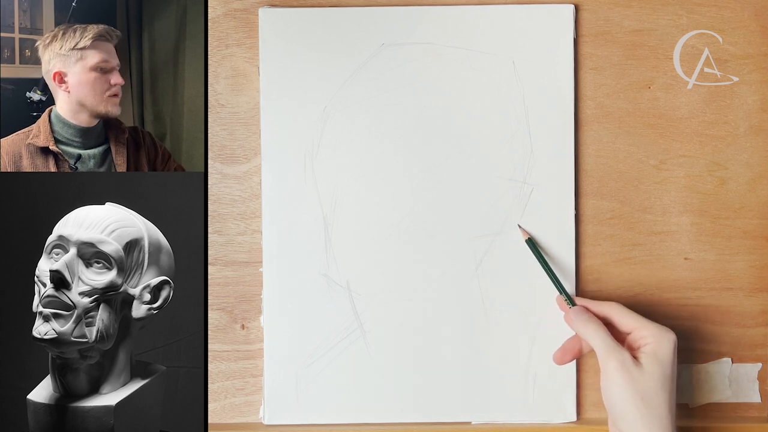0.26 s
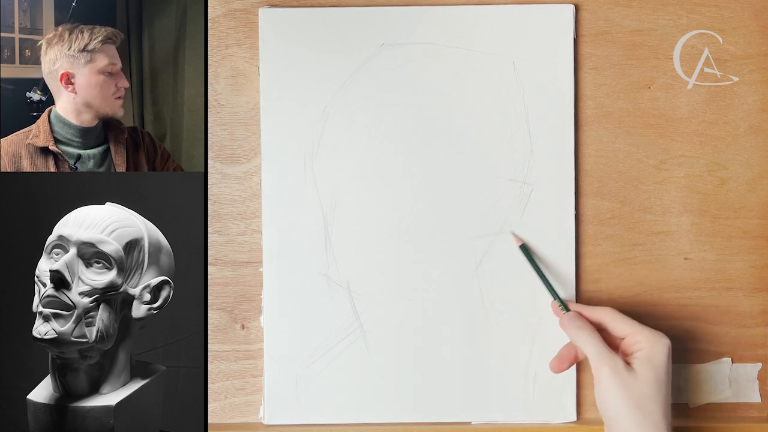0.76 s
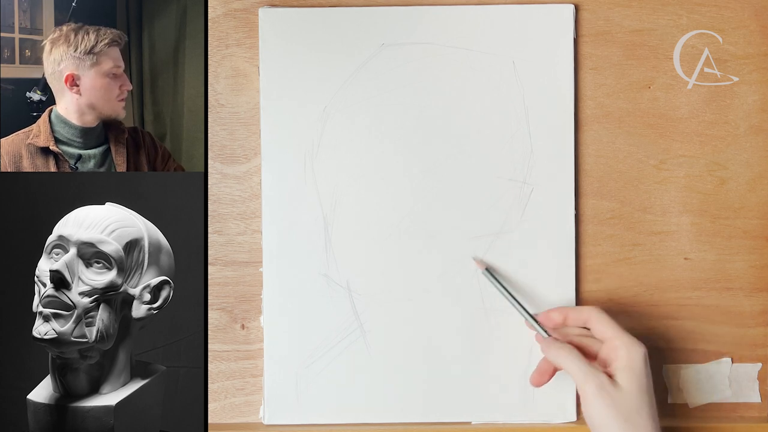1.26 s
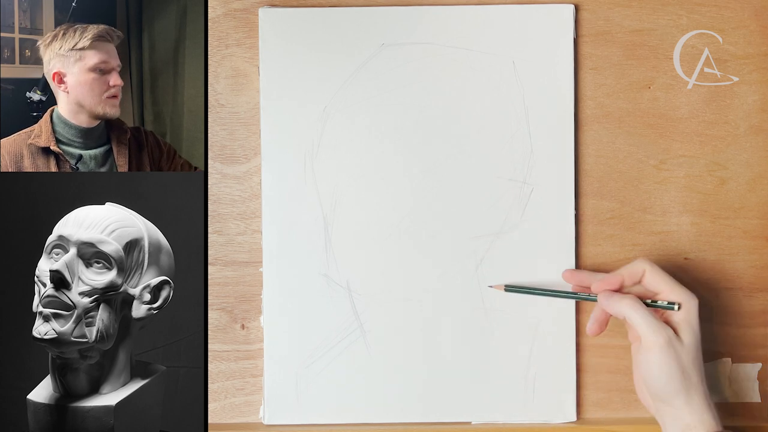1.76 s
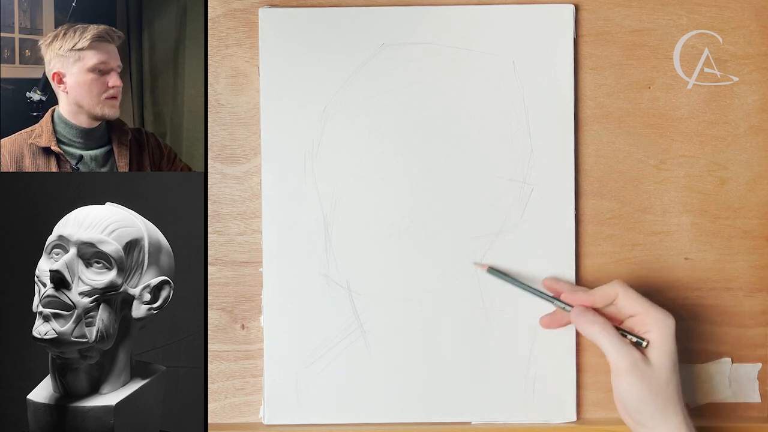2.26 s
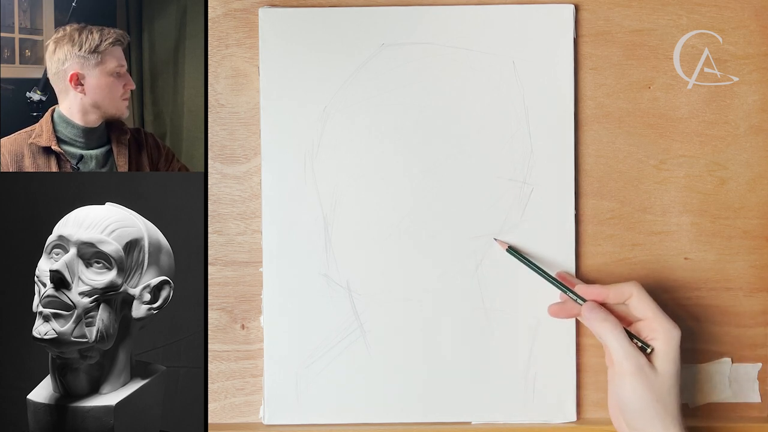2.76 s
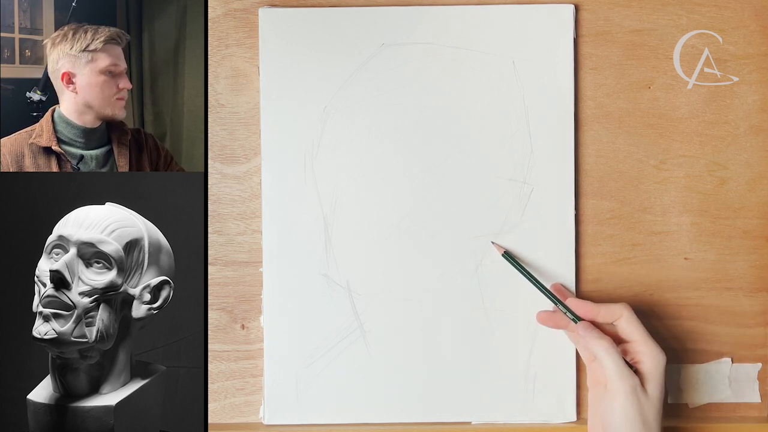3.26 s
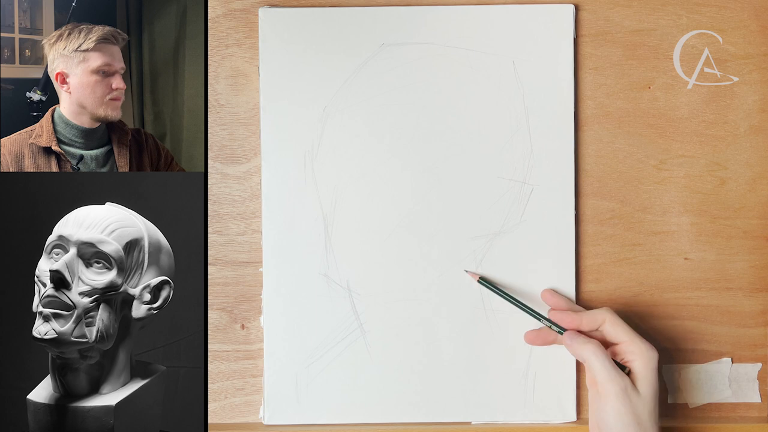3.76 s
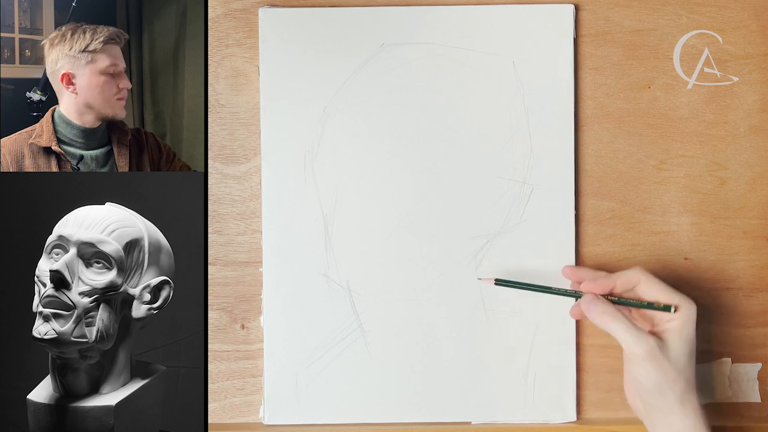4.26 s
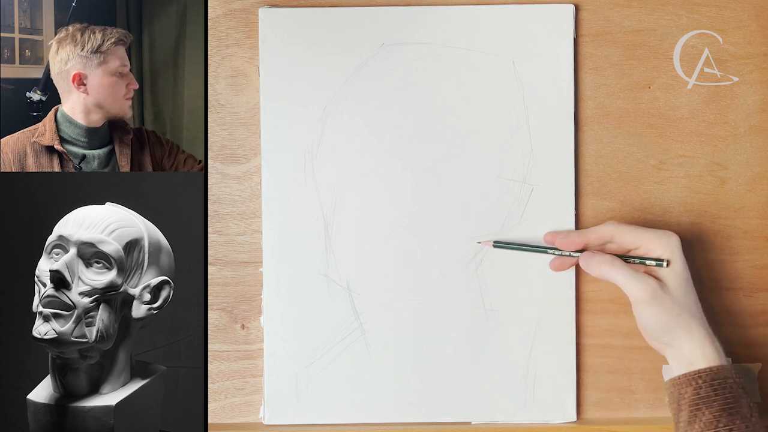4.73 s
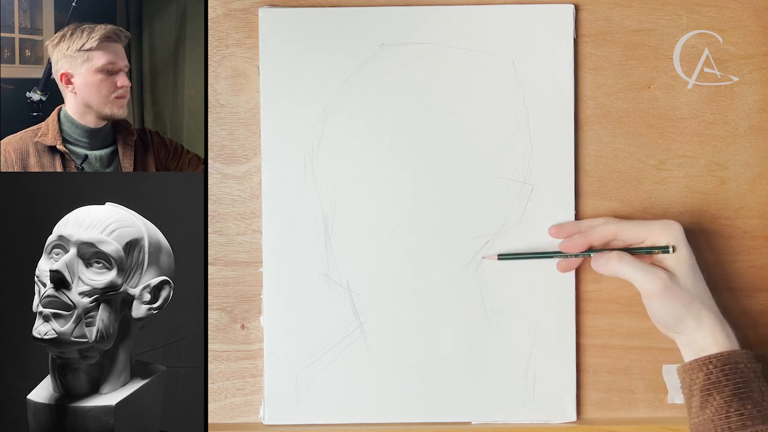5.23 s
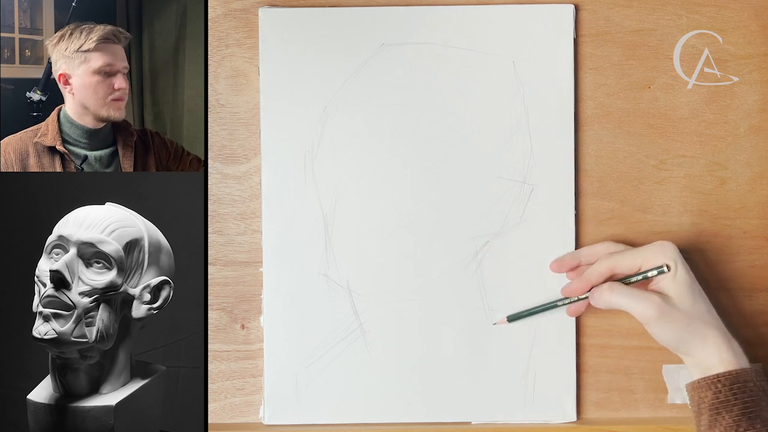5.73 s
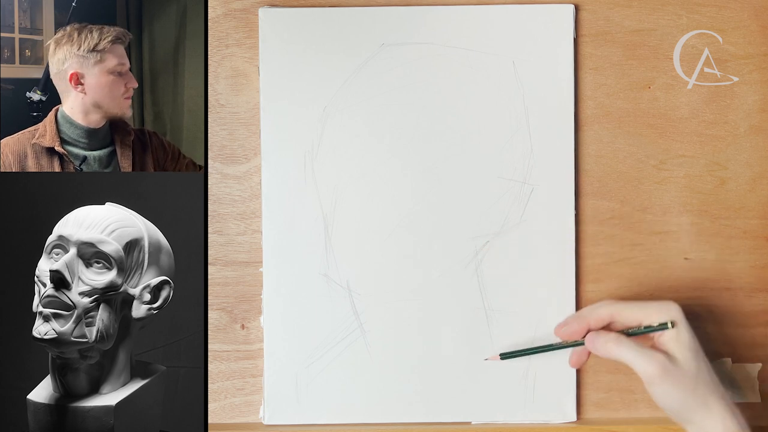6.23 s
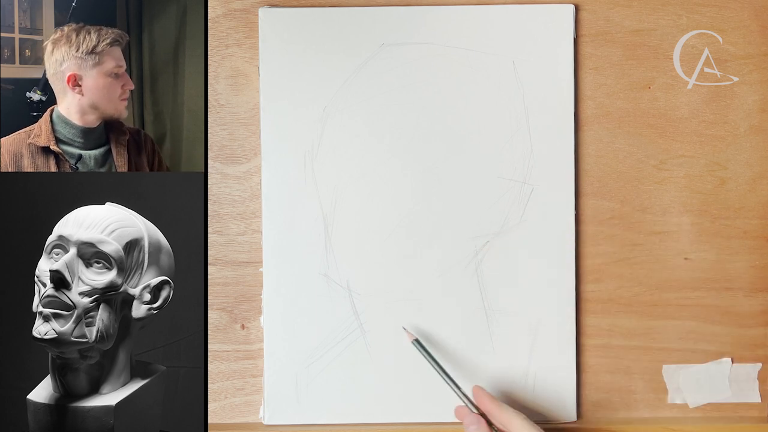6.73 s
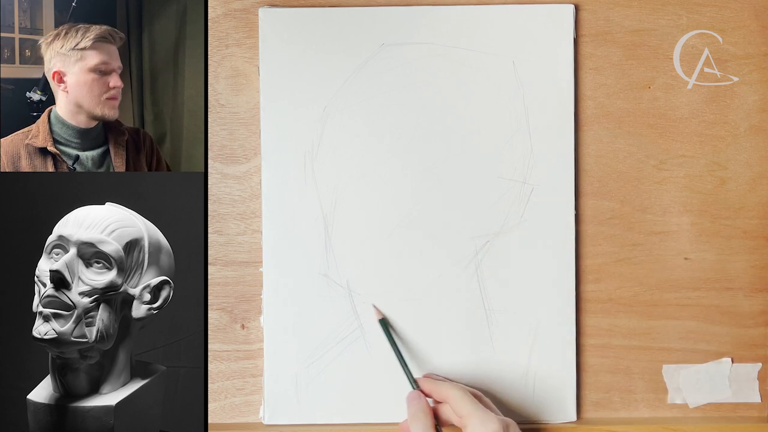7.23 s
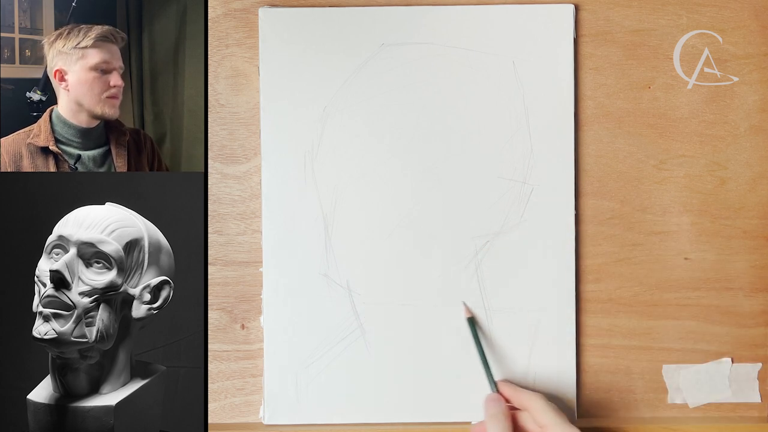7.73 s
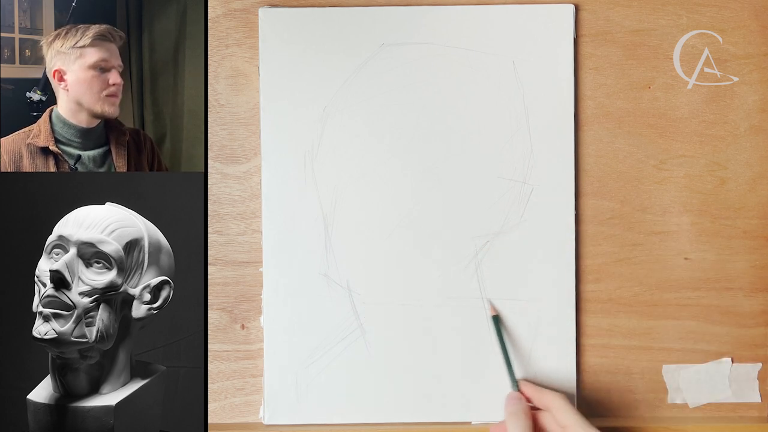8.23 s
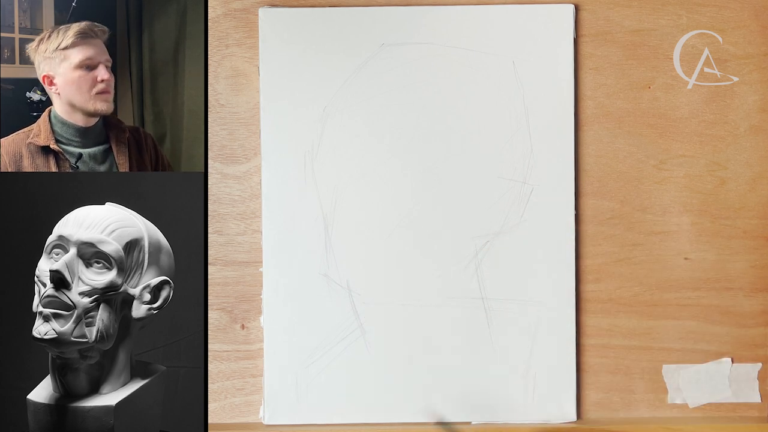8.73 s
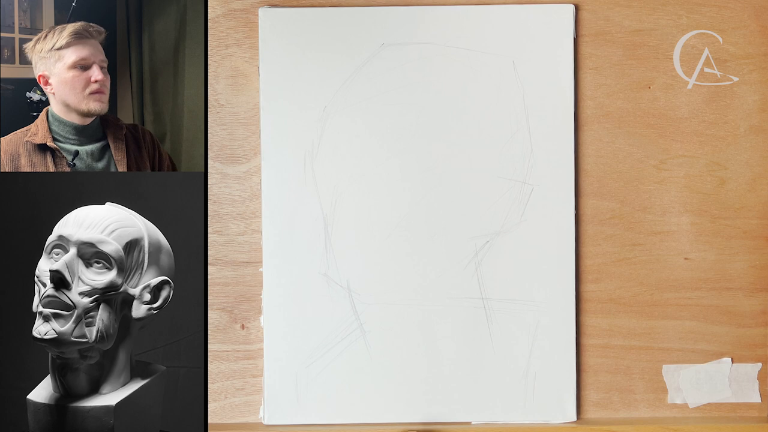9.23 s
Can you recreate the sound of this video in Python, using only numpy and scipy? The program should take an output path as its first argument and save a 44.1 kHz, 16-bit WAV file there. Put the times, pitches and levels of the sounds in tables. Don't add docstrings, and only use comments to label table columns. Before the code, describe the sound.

Close, crisp pencil sketching in a quiet room: quick hatching, single firmer strokes, soft hand rubs, one sharp clack near the end, low wavering hum.

```python
import sys
import numpy as np
from scipy import signal
from scipy.io import wavfile
from scipy.ndimage import uniform_filter1d

SR = 44100
rng = np.random.default_rng(int(sys.argv[2]) if len(sys.argv) > 2 else 0)


def materialize(psi):
    bounded = np.clip(np.atleast_2d(psi).T, -1, 1)
    quanta = np.round(bounded * 32767).astype(np.int16)
    wavfile.write(sys.argv[1], SR, quanta)


def how_loud(loudness_db):
    steps = np.asarray(loudness_db, float) / 20
    return 10 ** steps


N = 418509


def evened(x):
    return x / np.sqrt(np.mean(x ** 2) + 1e-20)


def coloured(x, points, size=2048):
    point_hz, point_db = np.transpose(points)
    hz = abs(np.fft.fftfreq(size, 1 / SR))
    log_gain = np.interp(np.log(hz + 1), np.log(point_hz + 1), point_db) * np.log(10) / 20
    taps = np.fft.ifft(np.exp(np.conj(signal.hilbert(log_gain)))).real
    first_half, second_half = abs(taps[1:size // 2]).sum(), abs(taps[size // 2:]).sum()
    if first_half <= second_half:
        taps = np.roll(taps[::-1], 1)
    return signal.oaconvolve(x, taps[:size // 2])[:len(x)]


def blend(low, high, lean_db):
    share = 1 / (1 + how_loud(-2 * lean_db))
    return np.sqrt(1 - share) * evened(low) + np.sqrt(share) * evened(high)


def patchy(x, patchy_db, size=512):
    overlap = size * 3 // 4
    z = signal.stft(x, nperseg=size, noverlap=overlap)[2]
    patches = rng.standard_normal(z.shape[::-1]).T
    patches = uniform_filter1d(uniform_filter1d(patches, 3, 0), 14, 1)
    return signal.istft(z * how_loud(patchy_db * evened(patches)), nperseg=size, noverlap=overlap)[1][:N]


def modes_ring(modes):
    t = np.arange(SR // 4) / SR
    ring = 0
    for k, (hz, width, db) in enumerate(modes):
        fading = np.sqrt(width) * np.exp(-np.pi * width * t)
        ring = ring + (-1) ** k * how_loud(db) * fading * np.sin(2 * np.pi * hz * t)
    return ring


def add(mix, s, sound):
    part = mix[round(s * SR):][:len(sound)]
    part += sound[:len(part)]


def played(table, s):
    at, *columns = np.transpose(table)
    return [np.interp(s, at, c) for c in columns]


def hump(rows, s):
    peak_s, build_s, lift_s = np.transpose(rows)[:3, :, None]
    return (s - peak_s) / np.where(s < peak_s, abs(build_s), abs(lift_s))


EDGE_DB = 21
LEAN_SHARP = 1.3


def swells(rows, s):
    peak_db = np.transpose(rows)[3, :, None]
    return how_loud(2 * (peak_db - EDGE_DB * abs(hump(rows, s)) ** LEAN_SHARP)).sum(0)


# (frequency [Hz], level [dB])
HISS = [(5500, -47.5), (7000, 10), (10000, 3.5), (10600, -35.5)]
EDGE = [(9900, -39.5), (10400, 5.5), (13000, -4.5), (14200, -12)]
# (frequency [Hz], level [dB])
TIP = [(13500, -35), (14200, 1), (15600, -5), (16200, -21)]
TIP_DB = -7.5
# (frequency [Hz], level [dB])
DULL_SCRAPE = [(1450, -12), (2000, -2.5), (2760, -2), (3300, -2), (6000, -20.5)]
BRIGHT_SCRAPE = [(2500, -27.5), (3700, 2.5), (4400, 0.5), (4950, 6), (5600, 6.5), (6800, 6.5), (8000, -23)]
# (frequency [Hz], level [dB])
SKIN = [(900, -35), (1500, 2.5), (2000, -4.5), (2700, -1), (3600, -9.5), (6000, -39.5)]
# (frequency [Hz], level [dB])
SHAFT = [(2200, -36), (2650, 6.5), (2900, 3), (3300, -3.5), (4000, -35.5)]
# (frequency [Hz], width [Hz], level [dB])
LOW_SHEET = [(482.6, 18, -5.5), (623, 45, -1.5), (700, 32, -2.5), (766, 35, 0.5), (940, 60, 0)]
HIGH_SHEET = [(1079, 70, 0), (1197, 67, -1.5), (1400, 65, -0.5), (1580, 110, -7.5), (1725, 50, -4),
              (2026, 270, -13.5)]
LOW_BOARD = [(236, 44, -5.5), (270, 47, -1.5)]
HIGH_BOARD = [(341.9, 15.7, 1), (455, 164, -3)]


def pencil(catches_per_s=9000, uneven_db=1.0, flicker_db=0.2, mic_lift_db=-12, press=0.27):
    hiss_db, scrape_db, sheet_db, boom_db, skin_db, bite_db, grip_db, place_db, reach_db = contact()
    catches = rng.standard_normal(N) * how_loud(uneven_db * np.minimum(rng.exponential(1, N), 4))
    catches *= rng.random(N) < catches_per_s / SR
    catches *= how_loud(flicker_db * evened(uniform_filter1d(rng.standard_normal(N), 300)))
    shifting = patchy(catches, patchy_db=3.0, size=2048)
    flank = catches * rng.choice([-1., 1.], N)
    catches, flank = (patchy(x, patchy_db=2.5) for x in (catches, flank))

    pressed_db = press * np.clip(sheet_db - hiss_db, -20, 10)
    hiss = blend(coloured(flank, HISS), coloured(catches, EDGE), -0.5 + pressed_db)
    scrape = blend(coloured(flank, DULL_SCRAPE), coloured(catches, BRIGHT_SCRAPE), grip_db)
    skin = evened(coloured(flank, SKIN))
    bite = evened(coloured(catches, SHAFT))
    tip = evened(coloured(flank, TIP))

    bodies = (LOW_SHEET, HIGH_SHEET, LOW_BOARD, HIGH_BOARD)
    low_sheet, high_sheet, low_board, high_board = [
        signal.oaconvolve(shifting, modes_ring(modes))[:N] for modes in bodies]
    sheet = blend(low_sheet, high_sheet, place_db)
    board = blend(low_board, high_board, reach_db)

    out = how_loud(hiss_db + mic_lift_db) * hiss + how_loud(scrape_db) * scrape
    out += how_loud(skin_db) * skin + how_loud(bite_db) * bite
    out += how_loud(1.35 * sheet_db + TIP_DB) * tip
    return out + how_loud(sheet_db) * sheet + how_loud(boom_db) * board


# (peak time [s], build-up [s], lift-off [s], speed as hiss level [dB],
# pressure as ring of the sheet over hiss [dB])
LINES_DRAWN = [(1.086, 0.05, 0.08, -34, 1), (2.255, 0.029, 0.081, -44.5, 10.5),
               (2.225, 0.037, 0.12, -43, -6), (3.66, 0.02, 0.028, -51.5, 3), (3.7, 0.042, 0.067, -39, 5),
               (3.858, 0.09, 0.065, -44, 6), (3.993, 0.054, 0.07, -41.5, 9.5), (5.49, 0.022, .04, -63, 1),
               (5.508, 0.024, 0.1, -54, 8.5), (5.601, 0.12, 0.18, -43, 4.5),
               (5.897, 0.15, 0.056, -40.5, 3.5), (5.998, 0.03, .05, -48, 6), (6.09, 0.13, 0.094, -39, 6.5),
               (7.25, 0.085, .06, -52, -12), (7.335, 0.12, 0.2, -35, -12), (7.433, 0.1, 0.074, -42.5, 4),
               (7.68, 0.017, 0.13, -40, -6.5), (7.93, 0.075, 0.12, -43, 6.5), (8.0, 0.1, 0.091, -41.5, -22),
               (8.255, 0.088, 0.088, -52, 8.5), (8.469, 0.1, 0.049, -44.5, 5.5)]
HATCHING = [(.477, 0.048, 0.1, -41, -18.5), (.587, 0.051, 0.043, -43, -19),
            (0.676, 0.06, 0.066, -41, -21.5), (.78, 0.068, 0.066, -40, -18), (.886, 0.064, 0.059, -41, -13),
            (.988, 0.064, 0.063, -40, -13.5), (1.044, 0.017, 0.05, -41, -21.5),
            (1.812, .008, .04, -47.5, -12), (1.839, 0.024, 0.05, -31, -21.5),
            (1.938, 0.045, 0.039, -41.5, -20), (5.71, 0.19, 0.063, -43.5, -1),
            (5.82, 0.034, 0.034, -55, 11), (6.941, 0.088, 0.035, -48.5, -16.5),
            (8.19, 0.081, 0.13, -40, -22), (8.4, 0.031, 0.068, -64, 13), (8.521, 0.087, 0.052, -40, -28.5)]
GRAZES = [(.003, 0.007, 0.013, -53, -4.5), (0.099, 0.12, 0.064, -58, -18), (.4, 0.055, 0.064, -75, -13),
          (1.3, 0.032, 0.086, -66.5, -6), (1.507, 0.036, 0.086, -86, 17.5),
          (1.763, 0.0044, 0.043, -66.5, 2.5), (2.13, .021, .04, -77, 4), (2.682, 0.052, 0.052, -64, -1),
          (2.944, 0.032, 0.054, -64.5, 2.5), (3.133, 0.01, 0.054, -60.5, -3.5),
          (3.504, 0.027, 0.15, -79, -1), (4.49, 0.021, 0.059, -75, -4.5), (4.575, 0.052, 0.031, -73.5, -11),
          (4.625, 0.013, 0.042, -68, 1), (4.685, 0.025, 0.033, -69.5, 3.5), (4.82, 0.21, 0.13, -78, 4),
          (5.4, 0.024, 0.032, -79.5, -7), (7.09, 0.072, 0.73, -78.5, 6.5)]
DRAGS = [(2.203, 0.014, 0.09, -54.5, -1.5), (6.506, .006, .05, -81, 15), (6.526, 0.0077, 0.066, -46.5, -3),
         (6.58, 0.096, 0.088, -74.5, 13), (6.79, 0.011, 0.077, -44.5, -19), (7.667, .0025, 0.025, -49, -10),
         (8.803, .006, .08, -58, -36), (8.82, 0.066, 0.38, -49, -24), (9.15, .1, 0.14, -73, 0),
         (8.91, 0.087, 0.041, -52.5, -18), (8.938, 0.0032, 0.06, -29.5, -24),
         (8.944, 0.0078, 0.17, -40.5, -8.5), (9.33, 0.036, 0.068, -59.5, -23),
         (9.39, 0.037, 0.045, -49, -18), (9.03, .04, 0.071, -68, -13), (9.45, .04, 0.034, -81, 3)]
# (suddenness of landing [power], of lifting [power], sharpness of pressure [power],
# scrape over hiss [dB], grip [dB])
TOUCH = [
    (3.2, 2.75, 0.68, -8, 2),
    (2.5, 1.36, 1.5, -8, 7),
    (5.1, 3, 0.8, 0, 6.5),
    (3.9, 1.9, 0.5, -3, 10),
]
# (time [s], sheet as high over low tones [dB], board likewise [dB],
# grip shortened [dB], shaft freed [dB])
REACH = [(.6, 5, 7, 2, -3), (.75, 1, 20, 0, -3.5), (1., 4.5, 17, 3, -1), (1.8, 3, -8.5, -4.5, 1),
         (2.3, -3, 1, 3, 1.5), (3.7, 0, 2.5, 4.5, -2), (4., -5.5, -3, -1, -0.7),
         (5.6, 0.5, -2.5, -10.5, -3), (5.8, -6, 11, -3, -10.5), (5.9, -4, -10, -2.5, -4.5),
         (6.1, 4, 1.5, -7, 0), (6.8, -4, 6, 8, -3.5), (7.35, 3, -7, -2.5, 0), (7.5, -1, 14, 2, 5.5),
         (7.9, 0, 4, -6, -1.5), (8.25, -5, 5, -8.5, -1), (8.5, 3.5, 13.5, -7, 0.3), (8.9, 17, -1, -21, -6)]
# (time [s], towards high tones [dB])
TRAVEL = [(1.1, -6), (2.25, -13), (3.7, -5), (4.0, -4.5), (5.55, 17), (5.75, 2), (6.1, -7.5), (6.6, -1),
          (7.4, 4), (7.7, 2), (7.95, 14), (8.26, -20), (8.47, 10), (9.0, 3)]
# (time [s], swell [s], fade [s], level [dB])
LEANS = [(.05, 0.28, 0.13, -57), (.49, 0.13, 0.56, -60), (.74, 0.1, 0.15, -48.5), (.925, 0.055, 0.08, -42),
         (1.094, .06, 0.088, -36.5), (1.507, 0.049, 0.1, -54.5), (1.77, 0.026, 0.15, -51),
         (1.842, 0.099, 0.16, -50), (2.29, 0.19, 0.13, -47), (2.68, 0.23, 0.2, -64),
         (2.931, 0.029, 0.16, -54.5), (3.84, 0.38, 0.16, -51), (4.005, 0.032, 0.13, -47),
         (4.69, 0.22, 0.26, -59.5), (5.6, 0.18, 0.25, -49), (5.893, 0.22, 0.17, -49),
         (6.15, 0.078, 0.11, -49.5), (6.52, 0.036, 0.11, -52), (6.79, 0.0032, 0.17, -45.5),
         (7.34, 0.19, 0.09, -47.5), (7.45, 0.069, 0.11, -42), (7.74, 0.099, 0.15, -52.5),
         (7.93, 0.092, 0.14, -43.5), (8.025, 0.13, 0.096, -44.5), (8.29, 0.078, 0.053, -41.5),
         (8.48, 0.13, 0.089, -39.5), (8.95, 0.017, 0.39, -59.5), (9.39, 0.052, 0.044, -53)]
# (time [s], swell [s], fade [s], level [dB])
BITES = [(3.706, 0.026, .04, -49), (3.863, .04, 0.034, -70), (3.997, 0.036, 0.025, -53.5),
         (5.6, 0.082, 0.11, -49.5), (5.899, 0.031, 0.023, -47.5), (6.006, 0.016, 0.098, -44),
         (6.096, 0.057, 0.031, -59), (6.57, 0.041, 0.05, -67.5), (7.4, 0.064, 0.088, -46),
         (7.96, 0.096, 0.073, -52.5), (8.435, 0.025, 0.068, -53), (9.07, 0.066, 0.09, -56.5),
         (9.46, 0.33, 0.092, -68)]
SCRAPE_FOLLOWS, GRIP_PER_DB = 0.33, -0.3
LINGER = 1.23
EASE_DB = 9.5
BOOM_DB, SKIN_DB = -18.5, 5


def contact(step=64):
    s = np.arange(0, N + step, step) / SR
    power = np.full((6, len(s)), 1e-13)
    grip_sum, drift_sum = np.zeros(len(s)), np.zeros(len(s))
    place_db, reach_db, short_db, free_db = played(REACH, s)
    for rows, touch in zip((LINES_DRAWN, HATCHING, GRAZES, DRAGS), TOUCH):
        landing, lifting, peaked, scrape_db, grip_db = touch
        speed_db, press_db = np.transpose(rows)[3:, :, None]
        phase = hump(rows, s)
        early, late = np.maximum(-phase, 0), np.maximum(phase, 0)
        hiss = speed_db - EDGE_DB * (early ** landing + late ** lifting)
        eased = EASE_DB * abs(phase) ** peaked
        scrape = scrape_db + free_db + hiss - SCRAPE_FOLLOWS * eased
        sheet = speed_db + press_db - eased - EDGE_DB * (early ** landing + (late / LINGER) ** lifting)
        skin = sheet + (SKIN_DB if rows is DRAGS else -200)
        parts = how_loud(2 * np.array([hiss, scrape, sheet, sheet + BOOM_DB, skin]))
        power[:5] += parts.sum(1)
        pressed_grip_db = grip_db + GRIP_PER_DB * np.clip(sheet - hiss, -25, 25)
        grip_sum += (parts[1] * pressed_grip_db).sum(0)
        drift_sum += (parts[2] * np.clip(phase, -1, 1)).sum(0)
    grip_db = short_db + grip_sum / power[1]
    place_db = place_db + played(TRAVEL, s)[0] * drift_sum / power[2]
    power[3] += swells(LEANS, s)
    power[5] += swells(BITES, s)
    controls = [*10 * np.log10(power), grip_db, place_db, reach_db]
    return [np.interp(np.arange(N) / SR, s, c) for c in controls]


# (time [s], half length
# [s], level [dB], from [Hz], to [Hz])
SINGS = [(.07, .06, -85, 5360, 5100), (.48, 0.038, -52.5, 5430, 4660), (.585, 0.029, -53.5, 4170, 5800),
         (0.67, .04, -63, 5800, 4630), (0.778, 0.03, -48, 4000, 5900), (0.862, 0.028, -62, 5600, 4860),
         (0.98, 0.028, -55, 4200, 5370), (1.081, 0.029, -40.5, 1720, 1810), (1.106, 0.065, -43, 520, 466),
         (1.334, 0.058, -66.5, 5200, 5200), (1.344, 0.033, -74, 8700, 8700),
         (1.932, 0.015, -47.5, 5000, 5500), (2.232, 0.021, -49, 5400, 5250), (2.69, 0.023, -78, 8360, 8800),
         (2.957, .03, -65, 5240, 5130), (3.137, 0.013, -64, 5500, 5500), (3.994, 0.017, -51, 3300, 3800),
         (4.503, 0.03, -81, 8240, 8800), (4.566, 0.033, -80, 8450, 8700), (4.787, 0.04, -77, 5300, 4900),
         (4.873, .045, -80, 5240, 4600), (4.85, 0.062, -83, 3420, 3830), (8.78, 0.083, -71.5, 11100, 11200),
         (5.51, 0.024, -68, 787, 1100), (6.542, 0.027, -54.5, 1500, 1440), (6.56, 0.031, -53, 2570, 2340),
         (6.937, 0.023, -55.5, 5330, 5900), (7.897, 0.027, -52, 1800, 1790), (7.966, 0.076, -43, 870, 1070),
         (7.975, .03, -55, 3480, 5970), (8.163, .03, -51.5, 6000, 3520), (8.18, 0.066, -61, 3130, 1520),
         (8.412, 0.025, -76, 2820, 3330), (8.528, 0.012, -43, 3730, 6800),
         (8.981, 0.044, -46.5, 1900, 1700), (9.005, 0.096, -56, 5230, 4770),
         (9.056, 0.027, -54, 3700, 3480), (9.086, 0.037, -53, 1700, 1700), (9.34, 0.035, -80, 9000, 8900),
         (9.39, 0.012, -66, 5900, 8800), (9.44, 0.037, -56.5, 1730, 1710),
         (1.72, .045, -75.5, 2250, 2040), (.688, 0.017, -55, 1280, 1100), (.895, 0.023, -55, 1200, 960),
         (.9, .025, -54, 640, 636), (1.946, 0.041, -64, 1140, 1150), (2.117, .1, -76, 1870, 2340),
         (2.255, .02, -37.5, 1420, 920), (2.29, 0.048, -47.5, 290, 261), (2.56, 0.098, -75, 2120, 2080),
         (3.656, 0.016, -59, 1150, 1110), (3.694, 0.027, -59, 660, 625), (3.856, 0.056, -41.5, 640, 622),
         (3.968, 0.01, -51, 1730, 1750), (3.978, 0.033, -41.5, 623, 627), (5.563, 0.049, -41.5, 1400, 1120),
         (5.615, 0.067, -44, 1010, 1100), (5.678, 0.034, -43.5, 715, 793), (5.82, 0.034, -46.5, 770, 860),
         (5.878, 0.025, -51, 750, 666), (6.0, 0.02, -45, 1420, 1350), (6.057, 0.031, -42.5, 1750, 1560),
         (6.042, 0.06, -44, 680, 780), (7.374, 0.085, -51, 700, 630), (7.424, 0.03, -42.5, 800, 1230),
         (7.497, 0.057, -48, 332, 338), (8.785, 0.13, -60, 2020, 2200), (8.803, 0.21, -67, 4000, 4030),
         (9.438, 0.043, -57, 3050, 3300)]
SING_WIDTH = 0.1
GLIDE_BLUR = 0.39


def singing():
    out, grain = np.zeros(N), rng.standard_normal(N + SR)
    for s, half_s, db, from_hz, to_hz in SINGS:
        place = np.linspace(-1, 1, round(3 * half_s * SR))
        glide_hz = np.geomspace(from_hz, to_hz, len(place))
        turn = np.exp(2j * np.pi * np.cumsum(glide_hz) / SR)
        width_hz = SING_WIDTH * (from_hz + to_hz) / 2 + GLIDE_BLUR * abs(to_hz - from_hz)
        r = np.exp(-np.pi * width_hz / SR)
        start = max(s - 1.5 * half_s, 0)
        noise = grain[round(start * SR):][:len(place)]
        slow = signal.lfilter([1], np.convolve([1, -r], [1, -r]), noise / turn)
        add(out, start, how_loud(db) * np.cos(np.pi * place / 2) ** 2 * evened((turn * slow).real))
    return out


def struck(modes, rise_s):
    t = np.arange(SR // 2) / SR
    tones = sum(how_loud(db - 60 * t / t60) * np.sin(2 * np.pi * hz * t) for hz, db, t60 in modes)
    return (1 - np.exp(-t / rise_s)) * tones


# (time [s], peak level [dB], dull over sharp [dB])
TICKS = [(1.279, -35, -2), (1.358, -35, -10), (1.761, -38, -3), (2.127, -41, 7), (2.92, -31, -1),
         (2.578, -50, -3), (2.965, -54, -8), (3.1286, -41, 4), (4.618, -37, 2.5), (5.399, -56, -14),
         (5.466, -60, -3), (6.522, -37, 0), (6.784, -20.5, 0), (6.884, -57, -4), (7.1344, -43.5, -3),
         (7.557, -58, -5), (7.665, -29, -9), (8.39, -50, 1), (8.9377, -8.5, -4), (8.9435, -26, -3),
         (9.047, -30, 0), (9.2905, -50, -12), (9.376, -45, -5), (9.385, -40, -4)]
# (frequency [Hz], level [dB])
SHARP_CRACK = [(300, -32), (1000, -18.5), (2500, -14.5), (5200, 7), (8500, -10.5), (12000, -19.5),
               (15000, -12)]
DULL_CRACK = [(300, -9.5), (800, -4), (2500, -1.5), (4200, 3.5), (8500, -19), (12000, -33)]
# (frequency [Hz], level [dB], time to fall 60 dB [s])
THUD = [(137, -9, 0.17), (169, -0.5, 0.18), (265.4, 6.5, 0.092), (229, -1.5, 0.17), (466, -21, 0.07)]
THUD_S, THUD_DB = 6.786, -23
# (frequency [Hz], level [dB], time to fall 60 dB [s])
CUP = [(700, -48.5, 0.55), (5200, -18, 0.0076), (11900, -24.5, 0.006)]
CUP_S = 8.938


def knocks(crack_s=0.00031, lift_db=4):
    sharp, dull = np.zeros(N), np.zeros(N)
    u = np.arange(800) / SR / crack_s
    noises = rng.choice([-1., 1.], (len(TICKS), len(u)))
    for (s, db, dull_db), noise in zip(TICKS, noises):
        crack = how_loud(db + lift_db) * noise * u * np.exp(-u)
        dull_share = 1 / (1 + how_loud(-2 * dull_db))
        add(sharp, s, np.sqrt(1 - dull_share) * crack)
        add(dull, s, np.sqrt(dull_share) * crack)
    out = coloured(sharp, SHARP_CRACK, size=1024) + coloured(dull, DULL_CRACK, size=1024)
    add(out, THUD_S, how_loud(THUD_DB) * struck(THUD, rise_s=0.019))
    add(out, CUP_S, struck(CUP, rise_s=0.00048))
    return out


# (time [s], level [dB])
SLEEVE = [(0, -66), (.32, -82), (1.2, -64), (1.45, -97), (1.75, -70.5), (2.1, -70), (2.6, -67.5),
          (2.85, -74.5), (3.3, -74.5), (3.62, -75), (4.3, -96), (5.37, -99), (6.4, -86), (7.1, -79),
          (7.62, -99), (8.6, -62.5), (9.2, -62), (9.49, -62)]
# (frequency [Hz], level [dB])
CLOTH = [(150, -26), (350, 8), (900, -0.5), (1500, 1), (2100, -0.5), (3200, -9), (6000, -11.5),
         (12000, -28)]


def sleeve():
    rub = patchy(rng.standard_normal(N), patchy_db=3.0, size=1024)
    level_db = played(SLEEVE, np.arange(N) / SR)[0]
    return how_loud(level_db) * evened(coloured(rub, CLOTH))


def room(x, t60=0.24, wet_db=-15):
    at = np.arange(200, SR // 2, 20)
    at = at + rng.integers(0, 20, len(at))
    taps = np.zeros(SR // 2 + 20)
    taps[at] = rng.choice([-1., 1.], len(at)) * how_loud(-60 * at / SR / t60)
    return x + how_loud(wet_db) * signal.oaconvolve(x, taps / np.linalg.norm(taps))[:N]


MOTOR = {1: -79.5, 2: -62.5, 6: -73.5, 7: -71}
MOTOR_HZ, MAINS_HZ, MAINS_DB = 48.788, 100.0, -61
BEAT_NULL_S = .385


def hum():
    t = np.arange(N) / SR - BEAT_NULL_S
    motor = sum(how_loud(db) * np.sin(2 * np.pi * k * MOTOR_HZ * t) for k, db in MOTOR.items())
    mains = how_loud(MAINS_DB) * np.sin(2 * np.pi * MAINS_HZ * t)
    return np.sqrt(2) * (motor - mains)


# (frequency [Hz], level [dB per Hz])
AIR = [(22, -118), (45, -85.5), (80, -86), (250, -86.5), (345, -100), (390, -99), (630, -99), (800, -107),
       (1350, -108), (1500, -118), (3000, -122), (6300, -125), (9000, -132), (12500, -139), (13500, -130)]


def air():
    noise = patchy(rng.standard_normal(N), patchy_db=2.5, size=2048)
    return np.sqrt(SR / 2) * coloured(evened(noise), AIR, size=8192)


def scene():
    near = pencil() + sleeve() + singing() + knocks()
    return (room(near) + hum() + air())[None]


def top_cut(x):
    return signal.sosfilt(signal.butter(12, 16740, fs=SR, output="sos"), x)


# (frequency [Hz], level [dB])
MIC = [(6000, -2), (7200, -4), (7700, 4.5), (8600, 9), (10000, 5), (10270, -13), (10500, 2.5), (11300, 18),
       (12000, 12.5), (12700, -1.5), (13600, -20.5), (14000, -8), (14600, -6), (15600, -4.5)]
# (frequency [Hz], level [dB])
WEAKEST_HEARD = [(12000, -135), (12900, -126), (13500, -124), (14200, -128), (15600, -128), (15800, -70)]
# (from [s], to [s])
STARVED = [(6.56, 6.62), (7.68, 7.765), (8.995, 9.14)]
STARVED_HZ = 13300
MASKER_HZ, MASKED_DB = 11300, 29


def record(dry, group=8):
    hz, t, z = signal.stft(coloured(dry[0], MIC), SR, nperseg=1024, noverlap=512)
    starts = np.arange(0, len(hz), group)
    band_hz = hz[starts]
    smooth_power = uniform_filter1d(abs(z) ** 2, size=2, axis=1)
    band_db = 10 * np.log10(np.add.reduceat(smooth_power, starts) / group + 1e-20)

    wavering_db = band_db + 3.0 * rng.standard_normal(band_db.shape[::-1]).T
    kept = wavering_db > np.interp(band_hz, *np.transpose(WEAKEST_HEARD))[:, None]
    masker_db = band_db[abs(band_hz - MASKER_HZ).argmin()]
    masking_db = uniform_filter1d(masker_db, size=3) - MASKED_DB
    kept &= (band_db > masking_db) | (band_hz < MASKER_HZ)[:, None]
    starved = np.any([(t > a) & (t < b) for a, b in STARVED], axis=0)
    kept &= ~np.outer(band_hz > STARVED_HZ, starved)

    z = z * kept[np.arange(len(hz)) // group]
    mix = signal.istft(z, SR, nperseg=1024, noverlap=512)[1][None, :N]
    return top_cut(mix)


dry = scene()
out = record(dry)
materialize(out)
```